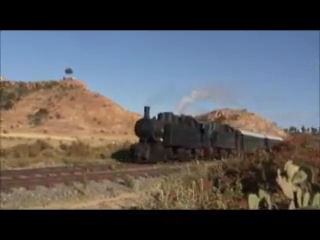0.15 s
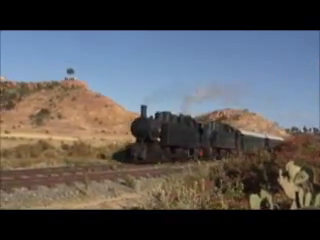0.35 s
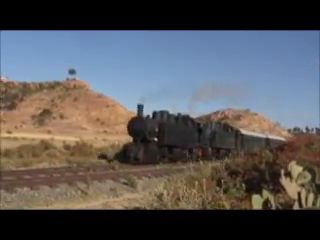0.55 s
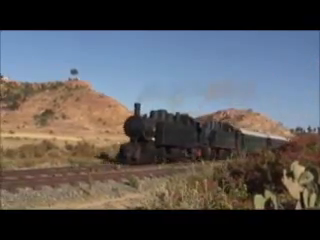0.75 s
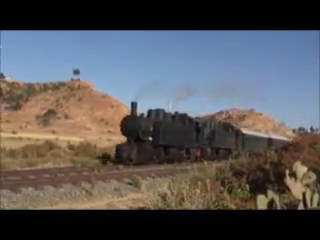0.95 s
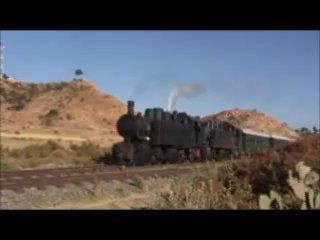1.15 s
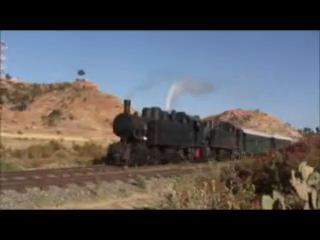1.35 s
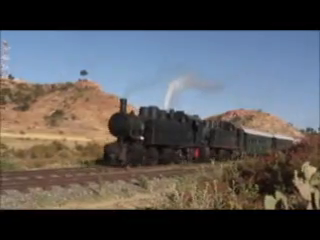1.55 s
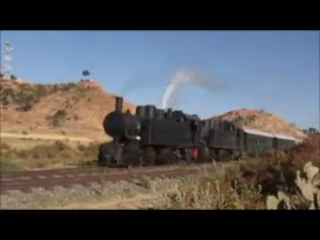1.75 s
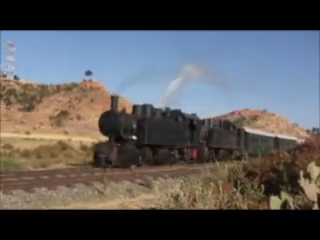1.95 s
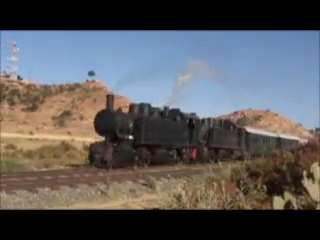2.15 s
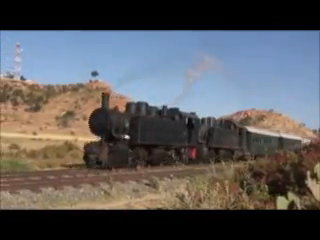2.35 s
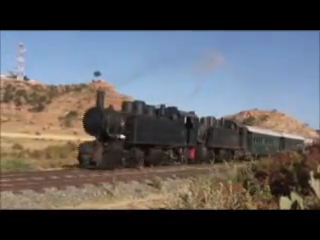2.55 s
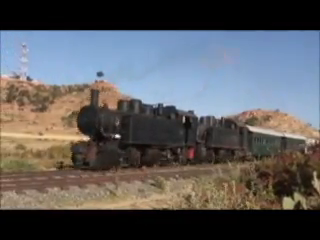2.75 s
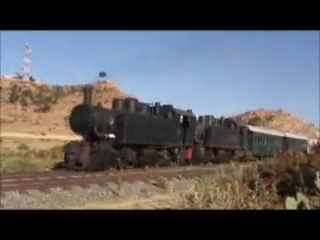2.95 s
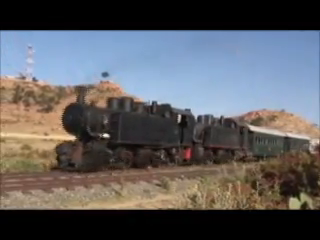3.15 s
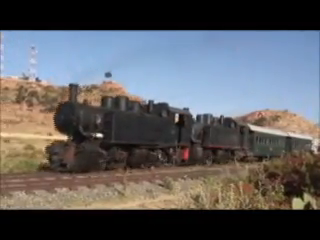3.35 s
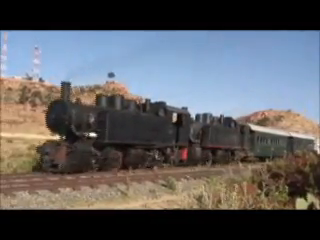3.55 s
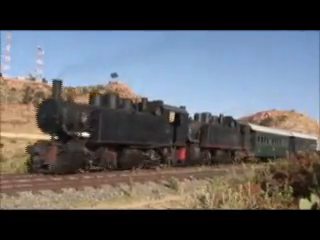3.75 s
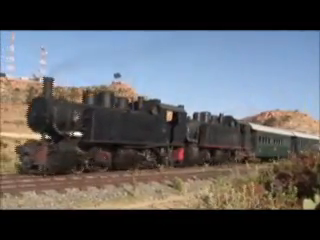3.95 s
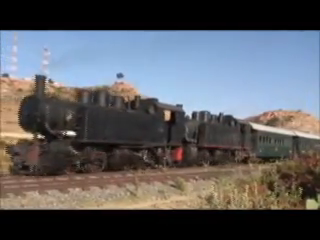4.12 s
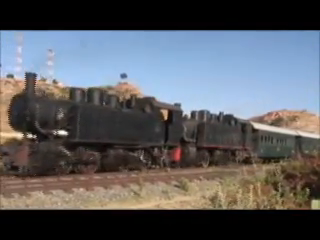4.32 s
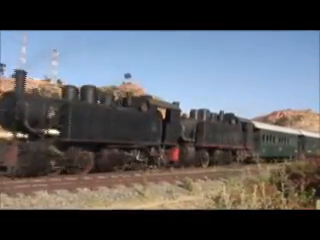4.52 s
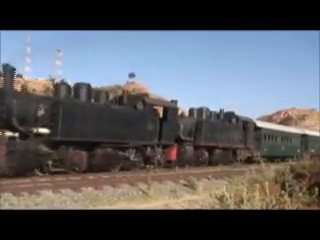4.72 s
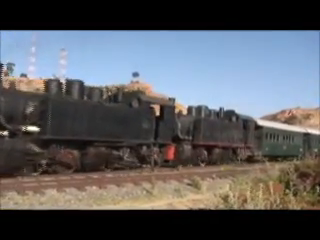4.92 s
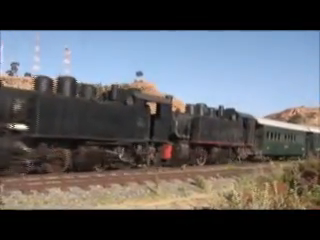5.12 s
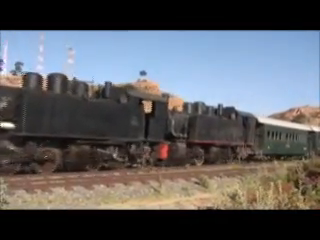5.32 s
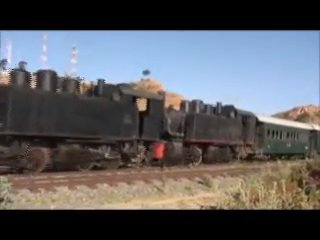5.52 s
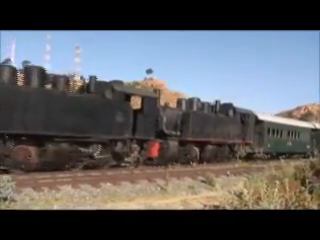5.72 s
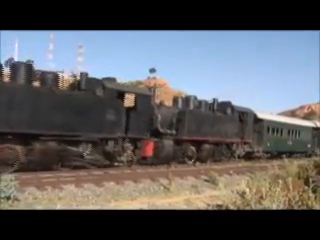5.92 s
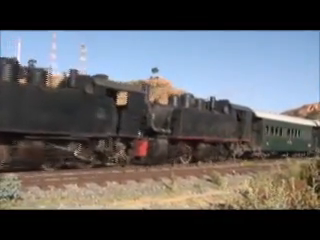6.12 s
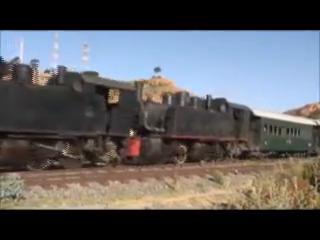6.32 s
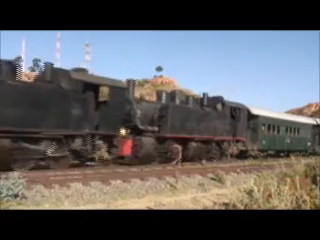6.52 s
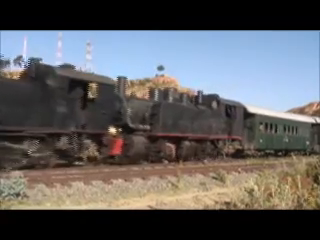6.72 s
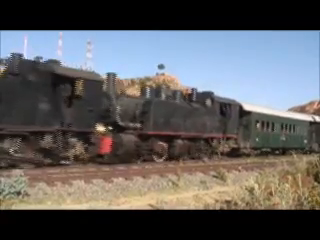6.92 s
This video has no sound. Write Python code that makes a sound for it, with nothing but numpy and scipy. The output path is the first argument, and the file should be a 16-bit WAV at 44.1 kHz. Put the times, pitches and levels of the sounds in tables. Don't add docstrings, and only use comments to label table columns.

```python
import sys
import numpy as np
from scipy import signal
from scipy.fft import rfft, irfft, next_fast_len
from scipy.io import wavfile
from scipy.ndimage import uniform_filter1d

SR = 44100
rng = np.random.default_rng(int(sys.argv[2]) if len(sys.argv) > 2 else 0)


def gain_from_decibels(decibels):
    exponent = np.asarray(decibels, float) / 20
    return 10 ** exponent


def int16_out(signal):
    q = np.round(np.clip(np.atleast_2d(signal).T, -1, 1) * 32767)
    wavfile.write(sys.argv[1], SR, q.astype(np.int16))


N = 311782
TIME = np.arange(N) / SR


def rms_one(x):
    return x / np.sqrt(np.mean(x ** 2) + 1e-20)


def bandpass(x, low_hz, high_hz, order=2):
    return signal.sosfilt(signal.butter(order, [low_hz, high_hz], "band", fs=SR, output="sos"), x)


def resonance(x, hz, width_hz):
    r = np.exp(-np.pi * width_hz / SR)
    zeros = np.array([1, 0, -1]) * (1 - r * r) / 2
    poles = [1, -2 * r * np.cos(2 * np.pi * hz / SR), r * r]
    return signal.lfilter(zeros, poles, x)


def band_level(x, low_hz, high_hz):
    return x / np.sqrt(np.mean(bandpass(x, low_hz, high_hz, 4) ** 2))


def in_time(rows):
    start_s, *columns = np.transpose(rows)
    return [np.interp(TIME, start_s, c) for c in columns]


def sounding(tables):
    gate = 0
    for table in tables:
        start_s, end_s = table[0][0], table[-1][0]
        gate = gate + np.interp(TIME, [start_s - .015, start_s, end_s, end_s + .015], [0, 1, 1, 0])
    return in_time([row for table in tables for row in table]), np.minimum(gate, 1)


def drift(rate_hz):
    r = np.exp(-40 * np.pi * rate_hz / SR)
    slow = signal.lfilter([1], [1, -2 * r, r * r], rng.standard_normal(N // 20 + 2002))[2000:]
    return np.interp(np.arange(N) / 20, np.arange(len(slow)), rms_one(slow))


def bump(s, rise_s, fall_s):
    out = np.zeros(N)
    near = slice(max(int((s - 4 * rise_s) * SR), 0), max(int((s + 4 * fall_s) * SR), 0))
    side_s = np.where(TIME[near] < s, rise_s, fall_s)
    out[near] = np.exp(-((TIME[near] - s) / side_s) ** 2)
    return out


def banded_noise(spectrum, patchy_db, flicker_hz):
    hz, level_db = np.transpose(spectrum)
    edges = hz[0] * 2 ** np.arange(0, np.log2(hz[-1] / hz[0]) + .34, 1 / 3)
    white, together = rng.standard_normal((2, N)), drift(flicker_hz)
    out = 0
    for k, (low, high) in enumerate(zip(edges, edges[1:])):
        own_db = np.interp(np.log(low * high) / 2, np.log(hz), level_db)
        flicker_db = patchy_db * (0.4 * together + drift(flicker_hz))
        out = out + gain_from_decibels(own_db + flicker_db) * bandpass(white[k % 2], low, high)
    return out


def breeze():
    air = rms_one(bandpass(rng.standard_normal(N), 30, 110))
    return gain_from_decibels(-46.5 + 2.83 * drift(7)) * bump(1.743, 0.14, 0.14) * air


# end_s, near_slope_db, near_decay_db_per_s, far_slope_db
ECHOES = [
    (.285, -27.5, 68, -38),
    (2.052, -18, 400, -42),
]


def hills():
    phase = 2 * np.pi * np.cumsum(2458 + 14 * drift(60)) / SR
    flutter_db, octave_flutter_db = 2.6 * drift(25), 3 * drift(25)
    beads = .9 + .5 * drift(28)
    out = 0
    for end_s, near_db, decay, far_db in ECHOES:
        since = np.maximum(TIME - end_s, 0)
        level = gain_from_decibels(near_db - decay * since) + gain_from_decibels(far_db - 6.5 * since)
        tone = level * gain_from_decibels(.5 * flutter_db) * beads * np.sin(phase)
        octave = gain_from_decibels(-52 - 40 * since + octave_flutter_db) * np.sin(2 * phase)
        out = out + np.minimum(since / .01, 1) * (tone + octave)
    return out


# start_s, level_db
NEARNESS = [(0.0, -51), (.5, -47), (2.1, -47), (2.9, -43), (3.5, -39), (4.0, -36.5), (4.5, -30.5),
            (4.98, -30), (5.4, -25.5), (5.9, -23.5), (6.14, -22.5), (6.4, -21), (6.62, -20.5),
            (6.86, -21.5), (7.03, -24), (7.07, -27)]
# peak_s, roar_lift_db, thump_lift_db, frame_ring_lift_db
EXHAUST_BEATS = [(.38, 3.5, -1, 0), (.635, 6, 11, 0), (.86, 10, 10, 3), (1.28, 10, 14, 4), (1.8, 13, -1, 6),
                 (2.243, 8, 0, 19), (2.5, 5.5, 7, 8), (2.57, 4.5, 5.5, 3), (2.727, 6.5, 3, 17),
                 (3.03, 2, 7, 1), (3.18, 4.5, 9.5, 6), (3.31, -0.5, 2, 5), (3.45, 3.5, -1, 7),
                 (3.682, 6, 6.5, 14), (3.96, 0, 6.5, 16), (4.14, 4.5, 4, 3), (4.22, -5, 5, 3),
                 (4.64, 3.5, -5, 34.5), (4.82, 0, 2, 32), (4.92, 1, 1.5, 23), (5.09, 3, 5.5, 29.5),
                 (5.3, 5, 2, 35), (5.55, 4.5, 7, -7), (5.795, 4.5, 7.5, 10), (6.048, 7.5, 7.5, 16),
                 (6.25, 5.5, 5.5, 6), (6.495, 2.5, 4, 23), (6.731, 5, 7, 24), (6.986, 9.5, 11, 4)]
# peak_s, level_db
ENGINE_LULLS = [(2.545, -6.5), (4.2, -0.5), (4.96, -2.5), (6.135, -4.5), (2.31, -2), (3.54, -2.5),
                (5.17, -2.5), (5.44, -1), (5.92, -1), (4.89, -1), (6.065, -1.5), (2.64, 2), (2.9, 0.5),
                (3.1, 0.5), (3.24, -1), (3.9, -1), (4.06, -0.5), (4.76, 0), (6.83, 0)]


def effort():
    lull_db = sum(db * bump(s, 0.024, 0.024) for s, db in ENGINE_LULLS)
    roar_db = ring_db = thump_db = 0
    for s, roar_lift_db, thump_lift_db, ring_lift_db in EXHAUST_BEATS:
        beat = bump(s, 0.058, 0.043)
        roar_db = roar_db + roar_lift_db * beat
        ring_db = ring_db + ring_lift_db * beat
        thump_db = thump_db + thump_lift_db * bump(s, 0.016, 0.04)
    return in_time(NEARNESS)[0] + 40 + lull_db, roar_db, thump_db - .5 * lull_db, ring_db


def frame(near_db, ring_db):
    level_db = -47 + 0.85 * near_db + ring_db
    ring = resonance(resonance(rng.standard_normal(N), 633, 47), 618, 97)
    return gain_from_decibels(level_db - 19.0) * rms_one(ring)


# vent_s, vent_db, cock_db, cock_opening_s, return_puff_db
WHEEL_TURNS = [
    (.05, -58, -62, 0.063, -59),
    (.845, -41, -58, 0.12, -76),
    (2.725, -41, -52, 0.36, -61),
    (3.685, -31, -53, 0.084, -57),
    (4.652, -24, -36.5, 0.047, -41),
    (5.603, -18.5, -29.5, 0.065, -34),
    (6.556, -48, -20, 0.038, -24.5),
]
# peak_s, level_db, length_s
STEAM_SWELLS = [(2.3, -4, 0.054), (2.82, -6, .04), (3.0, 0, 0.018), (3.15, 1.5, 0.045), (3.756, 5, 0.032),
                (4.223, -2.5, .03), (4.832, -2, .04), (5.156, 1, .04), (5.788, -3, 0.036),
                (6.115, -1.5, 0.044), (6.676, -2, 0.086), (6.81, 2.5, 0.029), (6.96, 1.5, 0.056),
                (6.293, 2.5, 0.035), (6.376, -1.5, 0.028), (6.5, -2.5, 0.017), (3.55, 2.5, .05)]


def leak(near_db):
    out = gain_from_decibels(-49.5 + 1.22 * near_db)
    for s, vent_db, cock_db, opening_s, puff_db in WHEEL_TURNS:
        open_s, shut_s = s - 0.27, s + 0.12
        held = (TIME > open_s) & (TIME < shut_s)
        creep, snap = bump(open_s, opening_s, 1e-3), bump(open_s, 0.0064, 1e-3)
        edges = 0.37 * creep + (1 - 0.37) * snap + bump(shut_s, 1e-3, 0.024)
        out = out + gain_from_decibels(cock_db) * (held + ~held * edges)
        out = out + gain_from_decibels(vent_db) * bump(s, 0.05, 0.026)
        out = out + gain_from_decibels(puff_db) * bump(s + 0.4, 0.075, 0.087)
    return out * gain_from_decibels(sum(db * bump(s, length_s, length_s) for s, db, length_s in STEAM_SWELLS))


# pitch_hz, level_db_per_hz
RUMBLE_SPECTRUM = [(24, -70), (40, -79), (112, -14.5), (241, 1.5), (301, -4.5), (469, -6), (633, -30),
                   (703, -2), (900, -10), (1170, -37), (1980, -120)]
# pitch_hz, level_db_per_hz
EXHAUST_SPECTRUM = [(200, -11), (420, 1), (650, 3), (1000, 4), (1500, 5), (2100, -2.5), (3000, -2.5),
                    (5000, -17.5)]
# pitch_hz, level_db_per_hz
STEAM_SPECTRUM = [(900, -6), (2000, -4), (3000, 0.5), (4500, 3.5), (6500, 1), (9000, -1), (13000, -6)]
# pitch_hz, width_hz, level_db
CHIMNEY_MODES = [(246, 23, -6), (630, 9.7, -3), (1030, 42, -12.5), (1325, 22, -13), (1470, 14, -9),
                 (2106, 43, -6)]
# start_s, level_db
WHISTLE_VALVE = [
    [(0.0, -1.5), (.24, -3), (.31, -18), (.45, -49)],
    [(.66, -29), (.8, -6.5), (.92, -6.5), (1.02, 1), (1.5, 2), (2.025, 2), (2.06, -15), (2.14, -42)],
]


def engine(near_db, roar_db, thump_db):
    (valve_db,), open_valve = sounding(WHISTLE_VALVE)
    lingering = open_valve * gain_from_decibels(0.82 * valve_db)
    rumbling = gain_from_decibels(thump_db) * (gain_from_decibels(-43.5 + 0.86 * near_db) + gain_from_decibels(-69) * lingering)
    roaring = gain_from_decibels(near_db - 39.5 + roar_db) + gain_from_decibels(-39.5 + 2.0 * drift(23)) * lingering
    hissing = leak(near_db) + open_valve * gain_from_decibels(-30 + valve_db + 0.31 * drift(25))

    rumble = band_level(banded_noise(RUMBLE_SPECTRUM, patchy_db=0.5, flicker_hz=14.0), 120, 570)
    ground = rms_one(bandpass(rng.standard_normal(N), 45, 140))
    roar = rms_one(banded_noise(EXHAUST_SPECTRUM, patchy_db=2.02, flicker_hz=13))
    for hz, width_hz, peak_db in CHIMNEY_MODES:
        roar += gain_from_decibels(peak_db + 4 + 3 * drift(8)) * resonance(roar, hz, width_hz)
    steam = band_level(banded_noise(STEAM_SPECTRUM, patchy_db=1.85, flicker_hz=11.0), 4340, 9100)
    top = signal.sosfilt(signal.butter(2, 8000, "high", fs=SR, output="sos"), steam)
    steam = steam + (gain_from_decibels(-4.5 + 0.27 * TIME + 0.52 * drift(7.8)) - 1) * top
    low = rumbling * rumble + gain_from_decibels(-70.5 + 1.5 * TIME + 0.98 * drift(5.2)) * ground
    return low + roaring * band_level(roar, 970, 2400) + hissing * steam


# start_s, peak_db
VALVE_TICKS = [
    (2.3491, -50),
    (3.297, -42),
    (4.255, -37.5),
    (5.22, -32.5),
    (6.163, -30.5),
]
# pitch_hz, level_db, t60_s
TICK_RING = [(4460, 9.5, 0.044), (5970, 2, .03), (1890, 6, 0.11)]


def ticks():
    out, t = np.zeros(N), np.arange(SR // 10) / SR
    ring = sum(gain_from_decibels(db - 60 * t / t60_s) * np.sin(2 * np.pi * hz * t) for hz, db, t60_s in TICK_RING)
    for s, peak_db in VALVE_TICKS:
        out[round(s * SR):][:len(t)] += gain_from_decibels(peak_db) * ring
    return out


# peak_s, level_db, squeak_start_hz, squeak_end_hz
VALVE_JETS = [
    (0.847, -18, 6800, 7900),
    (2.724, -24.5, 6800, 7850),
    (3.685, -16.5, 6800, 7900),
    (4.647, -8.5, 6800, 7900),
    (5.593, -9, 6900, 7450),
    (6.475, -8.5, 6100, 6800),
    (6.55, -9, 6900, 7770),
]


def jets():
    out = np.zeros(N)
    hiss = rms_one(resonance(rng.standard_normal(N), 2450, 4000))
    wobble = rms_one(resonance(rng.standard_normal(N), 60, 150))
    for s, level_db, start_hz, end_hz in VALVE_JETS:
        hz = np.interp(TIME, [s - .04, s - .005], [start_hz, end_hz])
        squeak = np.sin(2 * np.pi * np.cumsum(hz) / SR) * (.45 + .35 * wobble)
        out += gain_from_decibels(level_db) * bump(s, 0.028, 0.013) * (squeak + gain_from_decibels(-7.0) * hiss)
    return out


# pitch_hz, level_db under the loudest ring
IRON_MODES = [(630, 1), (1030, -1.5), (1340, -7), (1480, -16), (1950, -15), (2900, -54)]
# start_s, peak_db, pitch_hz
FRAME_KNOCKS = [(2.555, -33, 437), (2.717, -23.5, 650), (2.772, -30, 600), (2.972, -33, 560),
                (3.169, -34, 490), (3.452, -25.5, 617), (3.669, -16.5, 666), (3.746, -23.5, 580),
                (3.938, -20, 672), (3.958, -21, 629), (4.126, -22.5, 516), (4.209, -29, 574),
                (4.334, -25, 650), (4.694, -17, 597), (4.806, -11, 625), (5.525, -12, 578),
                (5.76, -4.5, 638), (5.78, -6.5, 653), (6.477, -8, 630), (6.495, -11, 628),
                (5.3, -15.5, 630), (6.982, -16, 593), (2.235, -38, 615), (3.85, -28, 610), (4.92, -20, 623),
                (6.078, -11, 700), (6.72, -11, 616)]
# start_s, peak_db, pitch_hz
ROD_CLANKS = [(2.218, -35, 1320), (3.296, -23, 1030), (3.409, -28, 1300), (3.442, -24, 990),
              (4.013, -25, 1050), (4.45, -19, 1030), (4.528, -19.5, 1495), (4.637, -19, 1030),
              (4.796, -21, 1150), (4.907, -11.5, 1033), (5.07, -11.5, 1310), (5.109, -17, 1100),
              (5.281, -11.5, 1560), (5.291, -7.5, 1440), (5.417, -20, 1600), (5.799, -6, 1453),
              (6.001, -22, 1310), (6.031, -8, 1260), (6.078, -6.5, 1270), (6.096, -12.5, 1260),
              (6.202, -19, 1090), (6.231, -8, 1257), (6.28, -5.5, 1250), (6.399, -12, 1230),
              (6.575, -9, 956), (6.624, -10.5, 910), (6.698, -13.5, 1200), (6.761, -10, 1017),
              (6.944, -8, 1390), (6.998, -0.5, 1336), (2.411, -35, 1320), (2.49, -29, 1290),
              (3.019, -35, 1240), (3.18, -28, 1440), (3.666, -24, 1420), (3.74, -27, 1073),
              (3.952, -19, 1330), (4.137, -25, 1310), (4.257, -25, 1540), (4.362, -27, 934),
              (5.803, -7, 1016), (6.155, -19, 1500), (6.176, -15, 1260), (6.487, -11.5, 1007),
              (6.975, -8, 1000)]
# start_s, peak_db
HARD_BLOWS = [
    (3.444, -23),
    (4.21, -34),
    (4.908, -9),
    (5.117, -8),
    (5.798, 0),
    (6.034, -3),
    (6.081, 3),
    (6.997, -19),
]


def clanks():
    out, t = np.zeros(N + SR), np.arange(SR // 6) / SR
    hits = [(*row, 0.0083) for row in FRAME_KNOCKS] + [(*row, 0.006) for row in ROD_CLANKS]
    for s, peak_db, hz, swell_s in hits:
        shake = rng.standard_normal(len(t))
        u = t / swell_s
        swell = np.sqrt(u) * np.exp(.5 - u) + .22 * np.minimum(u, 1) * np.exp(-t / .03)
        rung = swell * np.sin(2 * np.pi * hz * t) * (1 + 2.5 * resonance(shake, 60, 120))
        for mode_hz, db in IRON_MODES:
            rung += gain_from_decibels(db + rng.normal(0, 6.5) + 11.0) * resonance(shake * swell, mode_hz, 67)
        at = round(s * SR)
        out[at:at + len(t)] += gain_from_decibels(peak_db - 4) * rung

    contact = np.zeros(N)
    for s, peak_db in HARD_BLOWS:
        contact[round(s * SR)] = gain_from_decibels(peak_db + 19.0)
    contact = signal.sosfilt(signal.butter(2, 2600, fs=SR, output="sos"), contact + 1e-18) + 1e-18
    ringing = sum(gain_from_decibels(db - 2.0) * resonance(contact, hz, 100) for hz, db in IRON_MODES)
    return out[:N] + 1.1 * resonance(contact, 1200, 500) + ringing


# start_s, pitch_hz, level_db
LOW_SINGING = [
    [(0.25, 858, -43), (0.262, 846, -51), (0.272, 793, -22), (0.286, 814, -22), (0.318, 817, -42),
     (0.35, 847, -41)],
    [(.66, 776, -60), (.688, 768, -22), (.712, 775, -17), (.734, 799, -28), (.758, 800, -17.5),
     (.78, 803, -20), (.796, 807, -17)],
    [(.796, 801, -15.5), (.824, 809.6, -16), (.92, 805, -14.5), (.992, 796, -13.5), (1.04, 819, -13),
     (1.052, 821, -12.5), (1.066, 855, -29), (1.09, 857, -34)],
]


def low_mode(sharp):
    (hz, level_db), gate = sounding(LOW_SINGING)
    phase = 2 * np.pi * np.cumsum(hz + 4.0 * drift(34.9)) / SR
    tone = np.sin(phase) + gain_from_decibels(-32) * sharp * np.cos(phase)
    return np.sqrt(2) * gain_from_decibels(level_db + 1.0 * drift(60)) * tone * gate


# start_s, level_db
LOW_BREATH = [
    [(0.0, -27), (.05, -19.5), (.17, -33.5), (.215, -23.5), (.255, -33)],
    [(1.09, -37), (1.228, -31), (1.274, -33), (1.298, -29), (1.394, -34), (1.49, -31), (1.76, -35.5),
     (1.964, -28.5), (2.03, -30)],
]


def low_breath(air):
    (level_db,), gate = sounding(LOW_BREATH)
    breath = rms_one(resonance(resonance(air[1], 880, 55), 880, 200))
    breath += gain_from_decibels(-7) * rms_one(resonance(resonance(air[0], 710, 570), 350, 550))
    return breath * gain_from_decibels(level_db + 3.5 * drift(0.7)) * gate


# start_s, level_db
MODE_MIXING = [(.76, 4), (.83, 3), (.9, 2), (.95, 1), (.985, -2), (1.01, 0), (1.04, 1.5), (1.06, -10)]


def sum_tones(tone, octave, low, breath):
    mixed = resonance((gain_from_decibels(6.5) * tone + gain_from_decibels(4) * octave) * breath, 4300, 1300)
    strength = gain_from_decibels(in_time(MODE_MIXING)[0] + 1.76 * drift(25))
    mixed += strength * (gain_from_decibels(-2.0) * tone + gain_from_decibels(15.5) * octave + gain_from_decibels(-4.5) * low) * low
    mixed -= 0.49 * resonance(mixed, 1590, 700)
    return bandpass(mixed, 1350, 4600, 3)


# start_s, pitch_hz, level_db, octave_db
OVERBLOWN_MODE = [
    [(0.0, 2464, -12.5, -17), (.014, 2474, -11.5, -17), (.054, 2474, -20.5, -20), (.074, 2477, -8, -19),
     (.16, 2485, -8.5, -20), (.25, 2466, -6.5, -25.5), (.266, 2444, -6.5, -23), (.284, 2290, -23.5, -47),
     (.3, 2180, -32, -54)],
    [(.742, 2195, -36, -64), (.762, 2170, -15.5, -50), (.786, 2302, -15.5, -62), (.86, 2332, -21, -50),
     (.965, 2350, -25, -29.5), (.99, 2399, -10.5, -29), (1.04, 2434, -11.5, -32), (1.056, 2458, -5.5, -23),
     (1.07, 2449, -5, -15)],
    [(1.07, 2450, -5, -17), (1.112, 2475, -7, -21), (1.172, 2471, -5, -26), (1.2, 2476, -4, -32.5),
     (1.32, 2481, -6.5, -20.5), (1.394, 2474, -6.5, -21.5), (1.5, 2480, -9, -16.5)],
    [(1.5, 2480, -10.5, -14), (1.544, 2488, -6.5, -18), (1.686, 2480, -7.5, -20), (1.748, 2483, -6, -42),
     (1.838, 2489, -7, -19), (1.93, 2482, -6.5, -26), (2.03, 2480, -4, -17.5), (2.05, 2385, -34, -56)],
]
# peak_s, level_db
AIR_GUSTS = [
    (1.224, -7),
    (1.274, -7.5),
    (1.471, -7.5),
    (1.81, -0.5),
    (1.992, -6.5),
]


def whistle():
    (hz, level_db, octave_db), gate = sounding(OVERBLOWN_MODE)
    level_db = level_db + sum(db * bump(s, 0.022, 0.022) for s, db in AIR_GUSTS)
    phase = 2 * np.pi * np.cumsum(hz + 1.2 * drift(19)) / SR
    tone = gain_from_decibels(level_db + .9 * drift(30)) * np.sin(phase)
    octave = gain_from_decibels(octave_db + 1.2 * drift(26)) * np.cos(2 * phase)
    upper = gain_from_decibels(level_db - 32 + 6 * drift(4.2) + 0.78 * drift(44)) * np.sin(3 * phase)
    upper += gain_from_decibels(level_db - 38 + 5 * drift(12)) * np.cos(4 * phase)
    upper += gain_from_decibels(level_db - 40 + 3 * drift(12)) * np.sin(5 * phase)

    air = rng.standard_normal((2, N))
    sharp = rms_one(signal.sosfilt(signal.butter(1, [20, 380], "band", fs=SR, output="sos"), air[1][::-1]))
    rough = signal.hilbert(rms_one(bandpass(air[0], 15, 130)), next_fast_len(N))[:N].conj()
    carrier = gain_from_decibels(0.72 * level_db - 22) * np.exp(1j * phase) + gain_from_decibels(octave_db - 18) * np.exp(2j * phase)
    skirt = np.real(rough * carrier)
    skirt += gain_from_decibels(level_db - 37) * sharp * np.cos(phase)
    edge = rms_one(resonance(resonance(air[0][::-1], 2650, 350), 2800, 400))
    skirt += gain_from_decibels(level_db - 29) * edge

    low, breath = low_mode(sharp), low_breath(air)
    mixed = sum_tones(tone, octave, low, breath)
    return np.sqrt(2) * (tone + octave + upper + skirt + mixed) * gate + low + breath


def scene():
    near_db, roar_db, thump_db, ring_db = effort()
    mono = hills() + engine(near_db, roar_db, thump_db) + frame(near_db, ring_db)
    mono = mono + ticks() + jets() + clanks() + whistle()
    return np.array([mono, mono])


# low_hz, high_hz, readiness to drop out
PATCHY_BANDS = [(40, 125, 1.6), (1990, 2090, .3), (2800, 2950, -.4), (2950, 3150, .4), (3480, 3650, .3),
                (3650, 3820, .2), (1400, 1480, -.9), (1900, 1990, -.5), (2610, 2700, -.4)]


def thin_bands(x):
    spectrum, hz = rfft(x), np.fft.rfftfreq(N, 1 / SR)
    tone = irfft(spectrum * ((hz > 2250) & (hz < 2550)), N)
    tone_db = 10 * np.log10(uniform_filter1d(tone ** 2, size=1500) + 1e-12)
    loud = np.clip((tone_db + 24) / 6, 0, 1)
    for low_hz, high_hz, readily in PATCHY_BANDS:
        band = irfft(spectrum * ((hz > low_hz) & (hz < high_hz)), N)
        x = x - band * loud * np.clip(2.5 * (readily + drift(8)), 0, 1)
    return x


def low_pass(x):
    return signal.sosfilt(signal.butter(12, 14220, fs=SR, output="sos"), x)


def record(dry):
    swell = bandpass(dry ** 2, 10, 35, 4)
    wet = 1.05 * np.tanh(dry / 1.05)
    wet = signal.sosfilt(signal.butter(2, 70, "high", fs=SR, output="sos"), wet) + gain_from_decibels(-33) * swell
    wet = signal.sosfilt(signal.ellip(12, .5, 80, 13150, fs=SR, output="sos"), wet)
    return low_pass(thin_bands(wet) + breeze())


dry = scene()
out = record(dry)
int16_out(out)
```